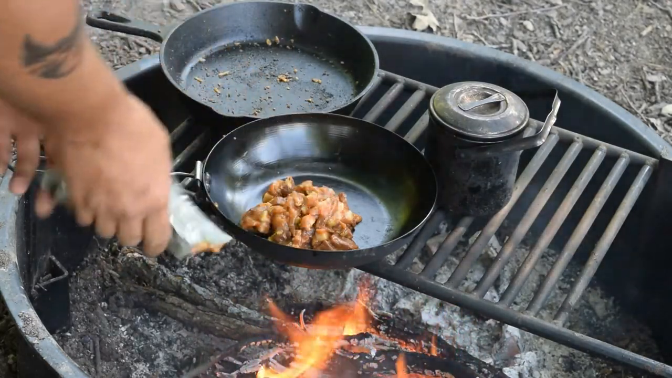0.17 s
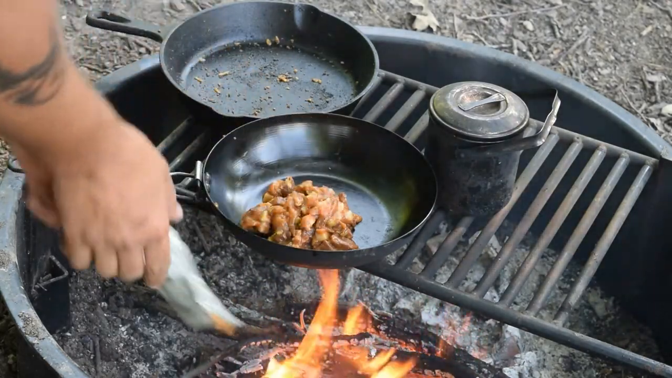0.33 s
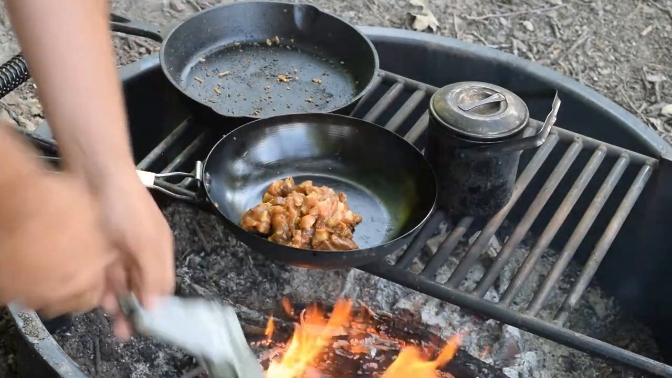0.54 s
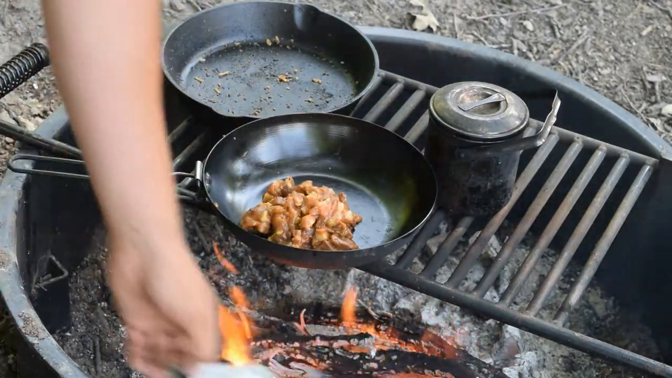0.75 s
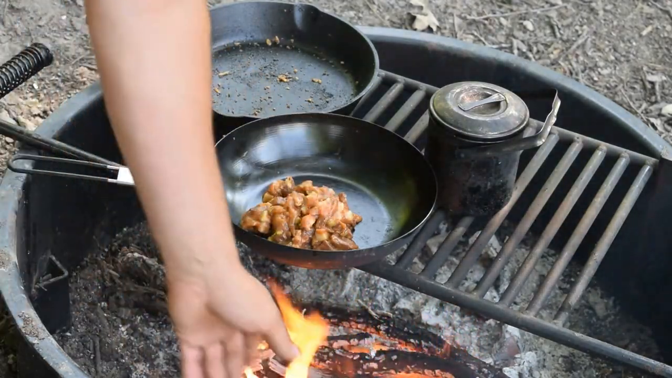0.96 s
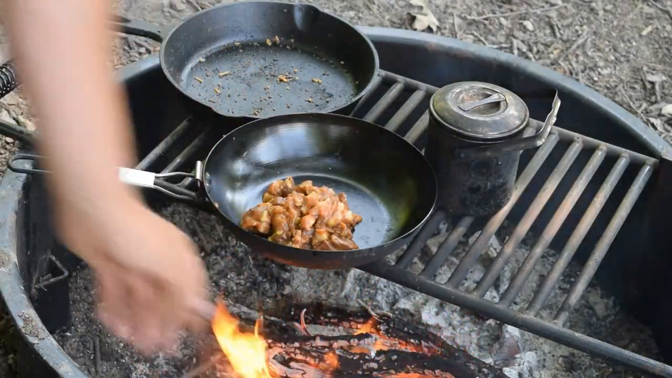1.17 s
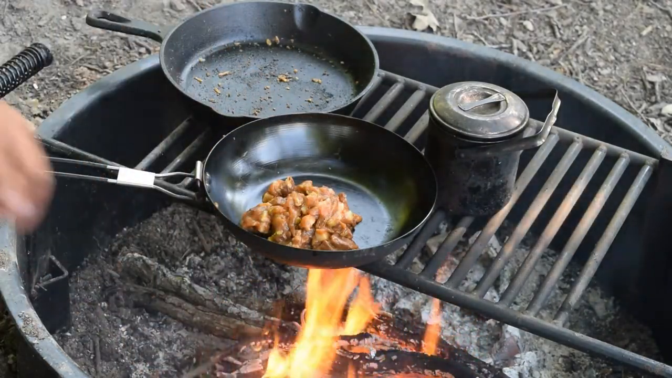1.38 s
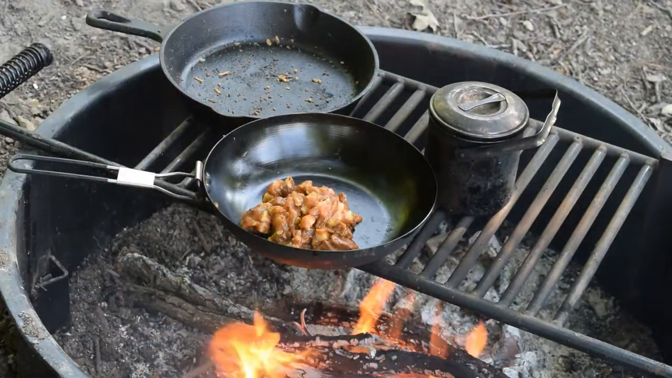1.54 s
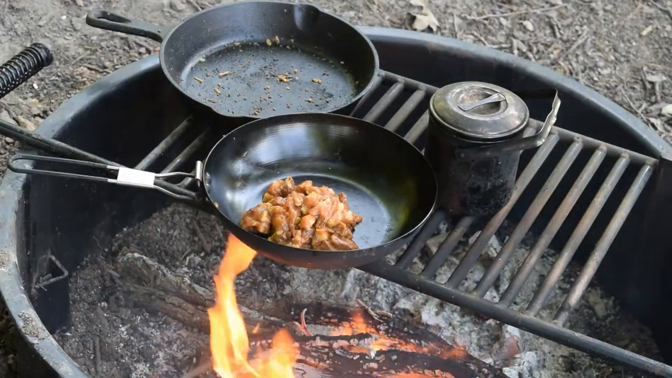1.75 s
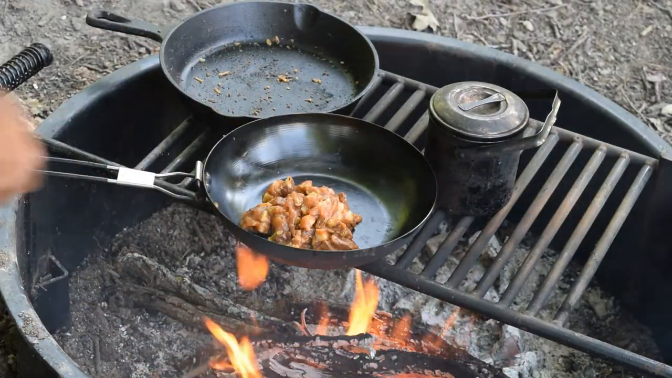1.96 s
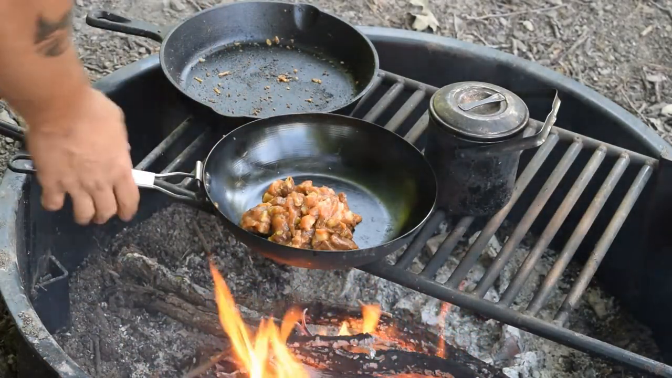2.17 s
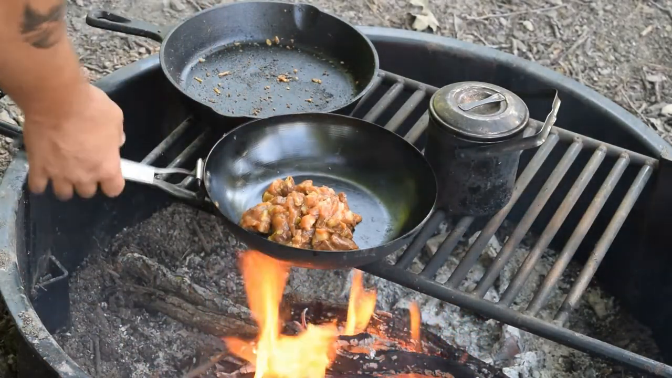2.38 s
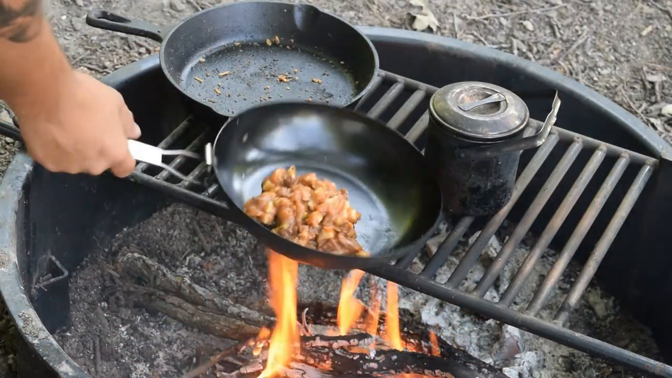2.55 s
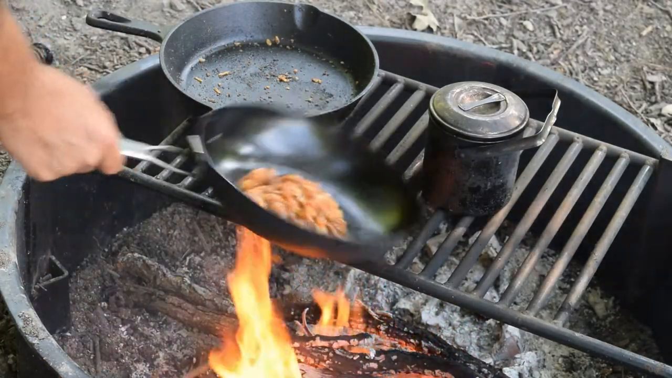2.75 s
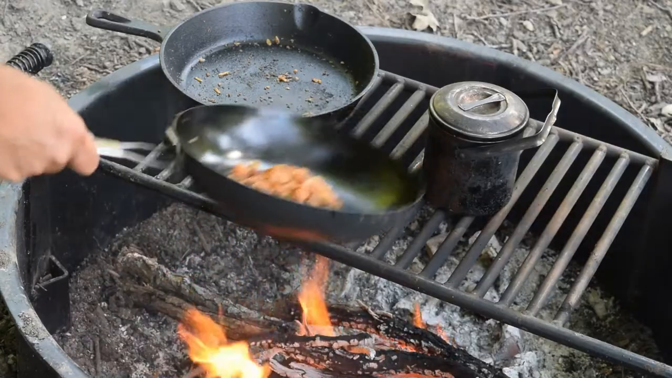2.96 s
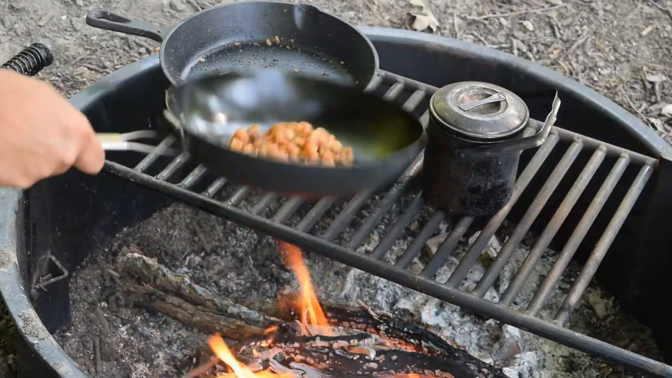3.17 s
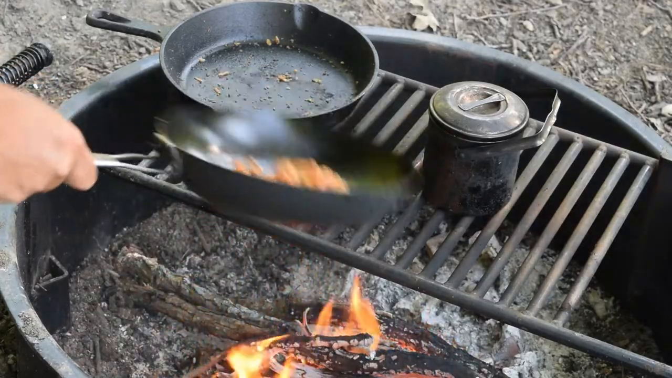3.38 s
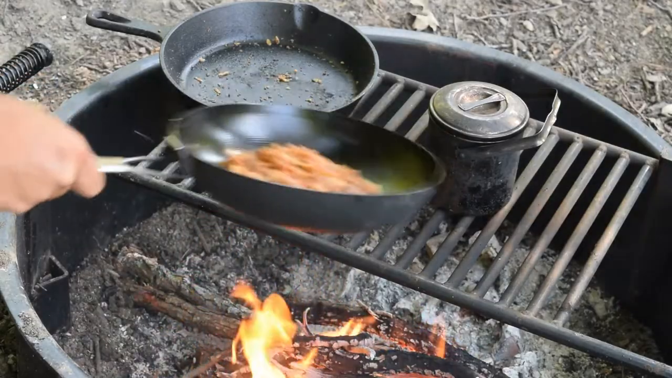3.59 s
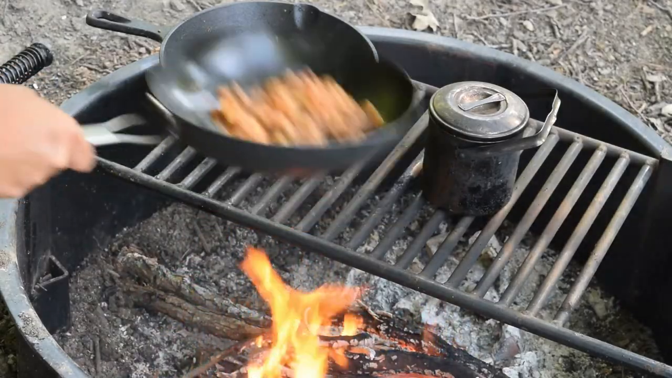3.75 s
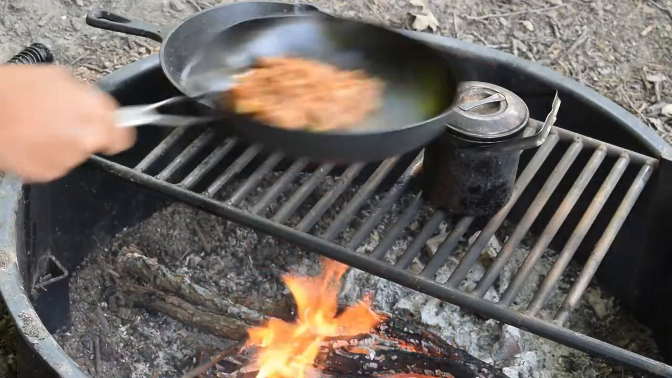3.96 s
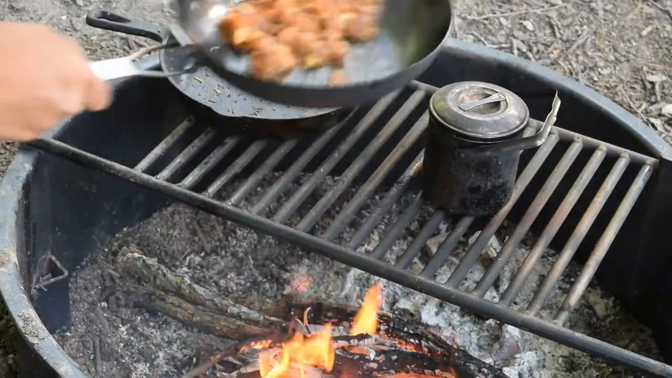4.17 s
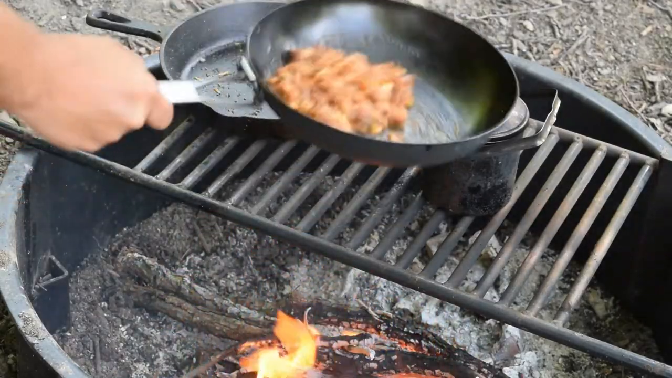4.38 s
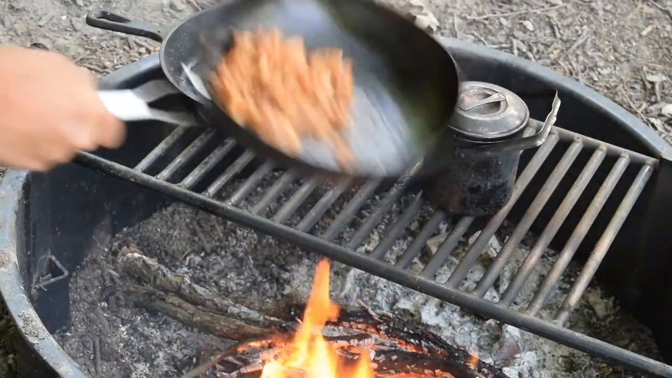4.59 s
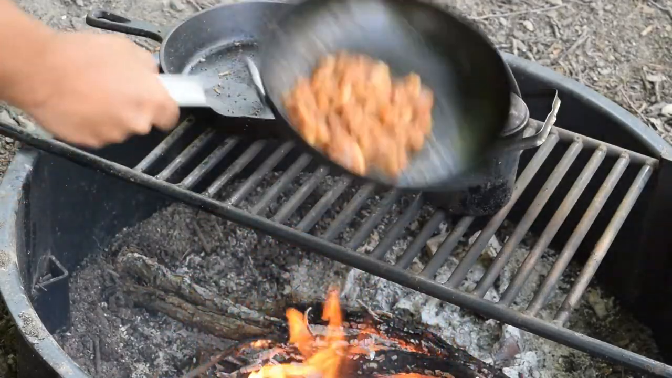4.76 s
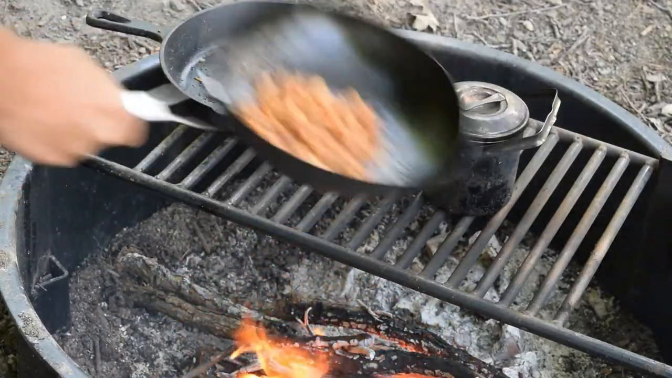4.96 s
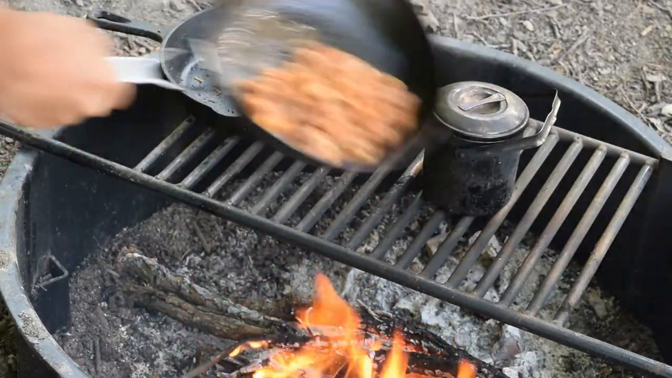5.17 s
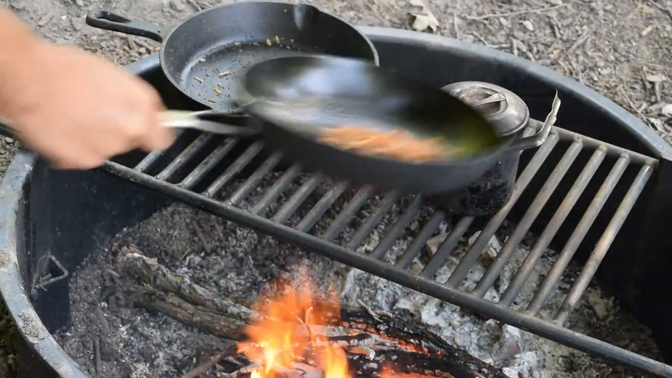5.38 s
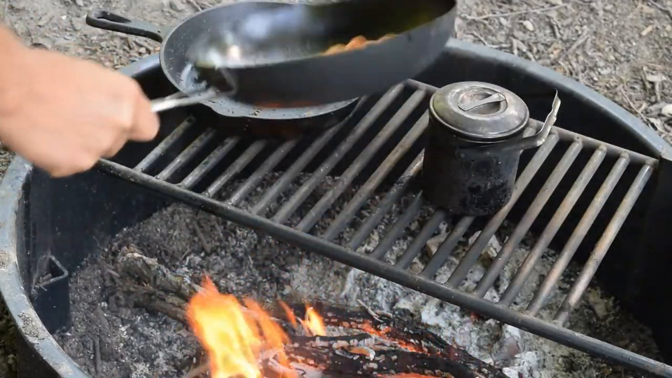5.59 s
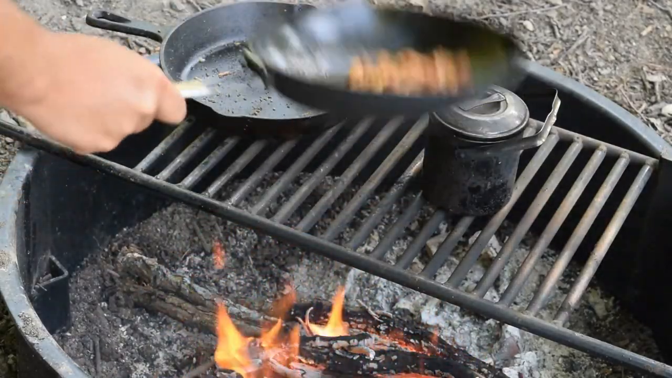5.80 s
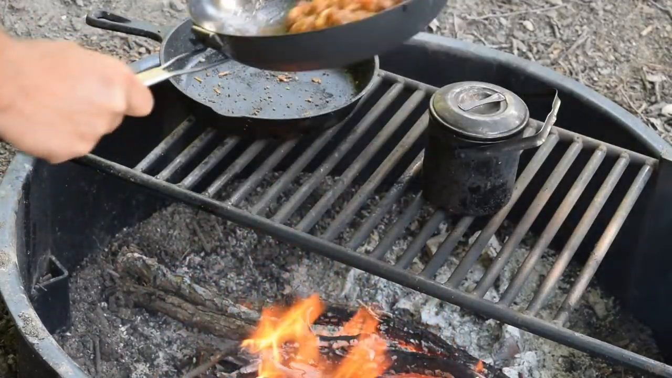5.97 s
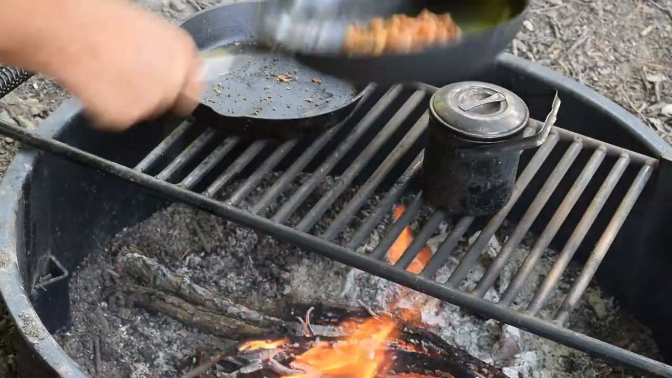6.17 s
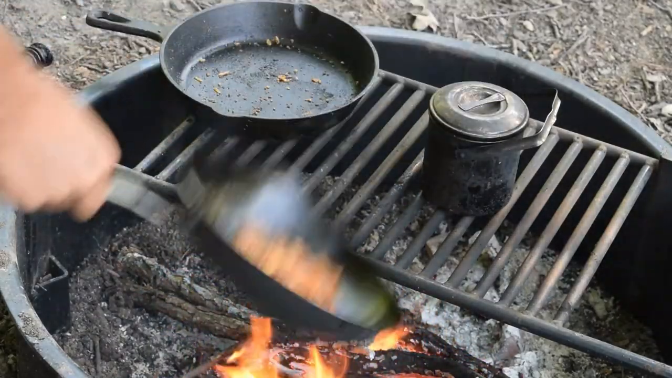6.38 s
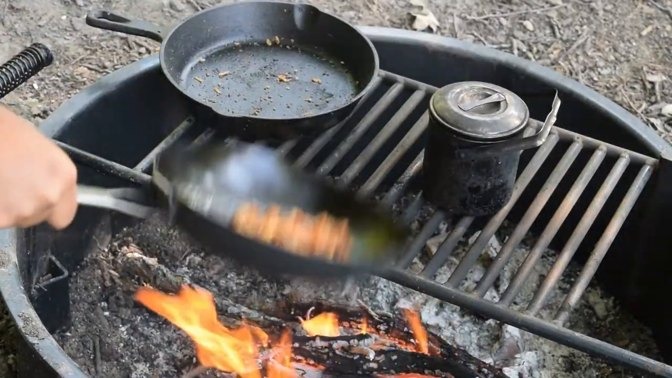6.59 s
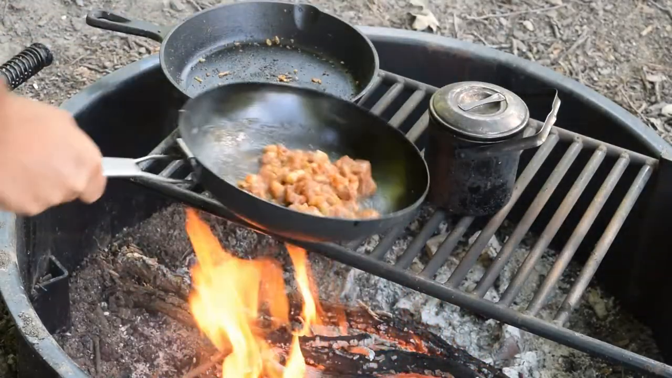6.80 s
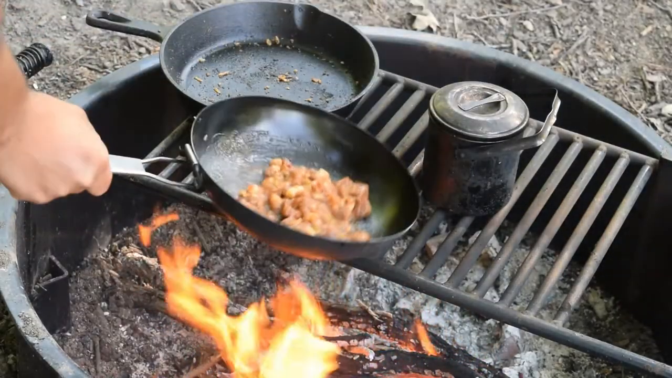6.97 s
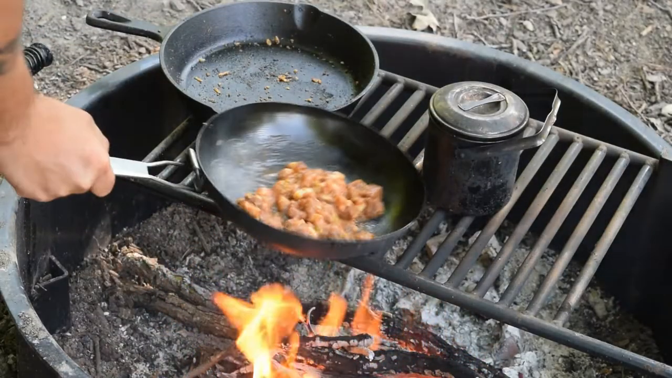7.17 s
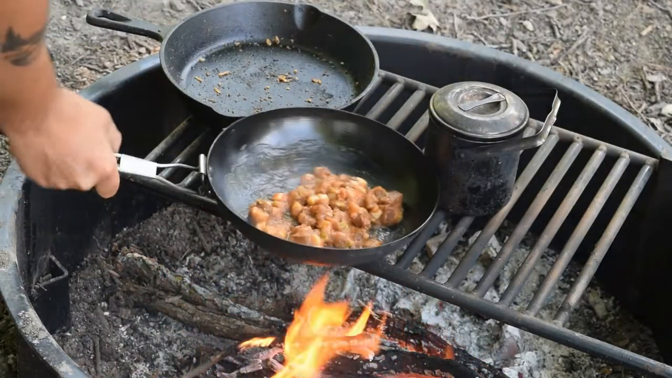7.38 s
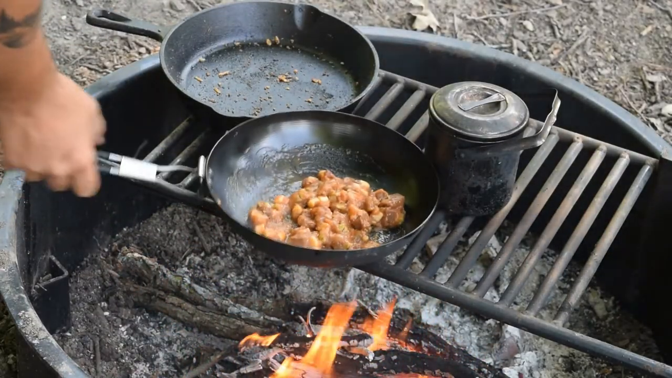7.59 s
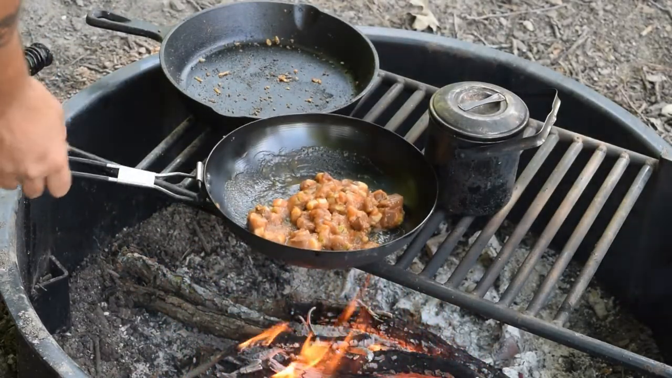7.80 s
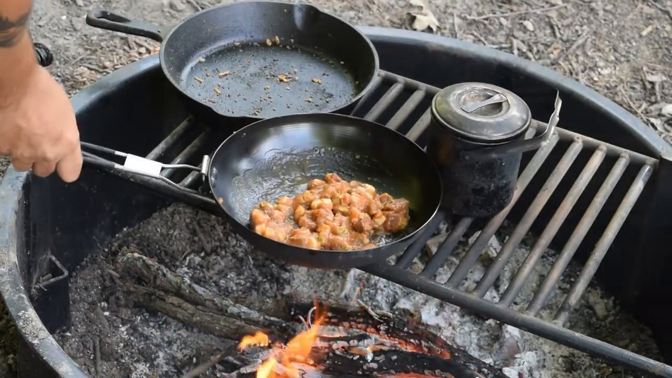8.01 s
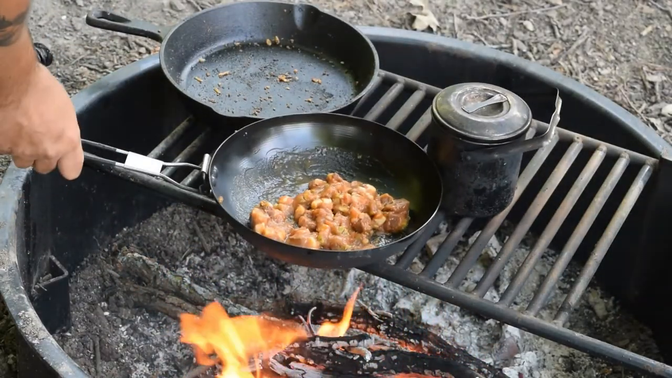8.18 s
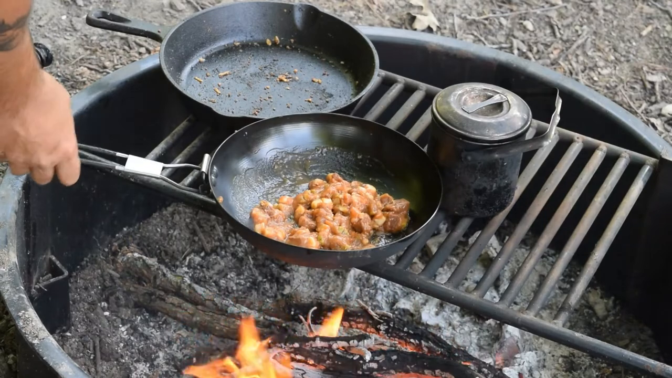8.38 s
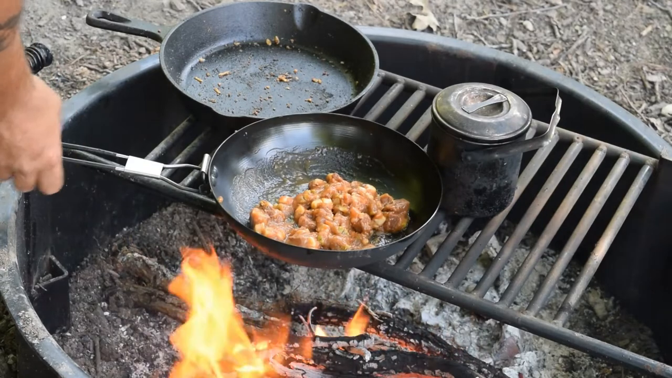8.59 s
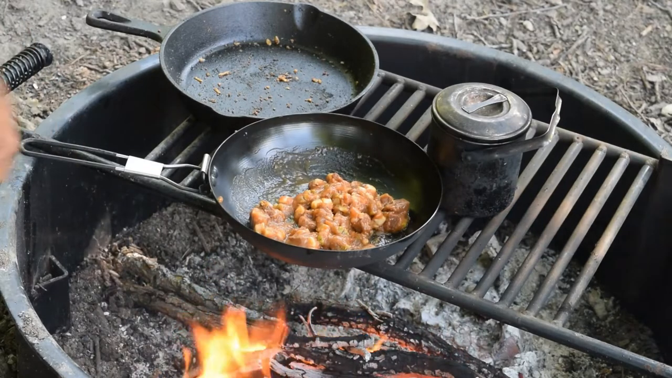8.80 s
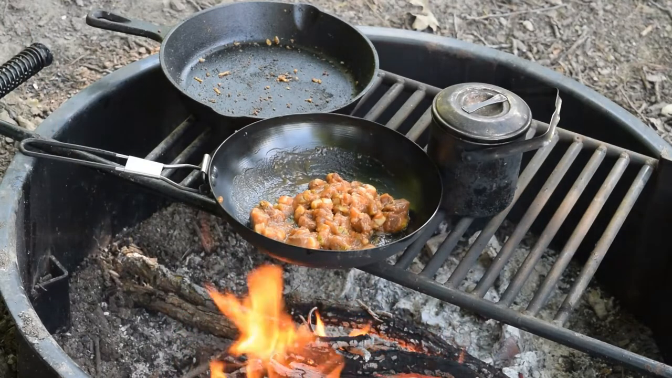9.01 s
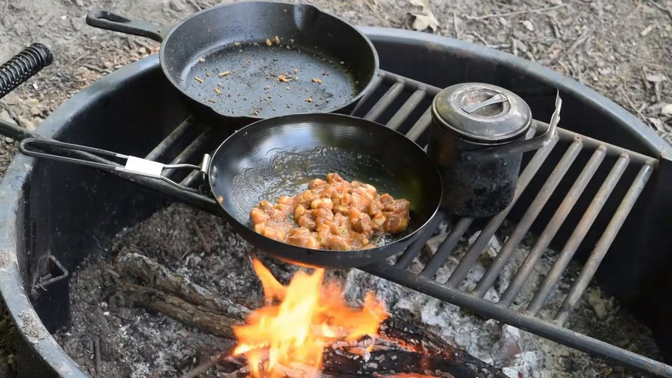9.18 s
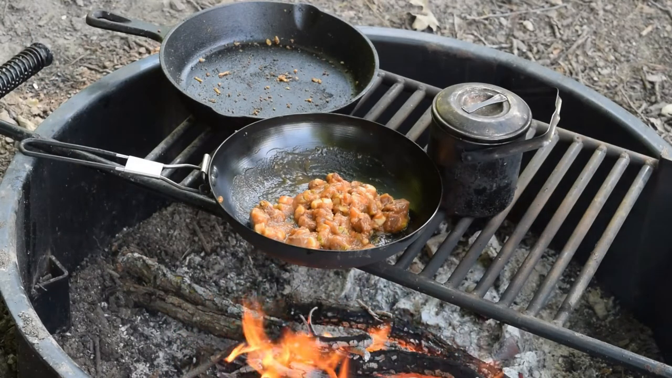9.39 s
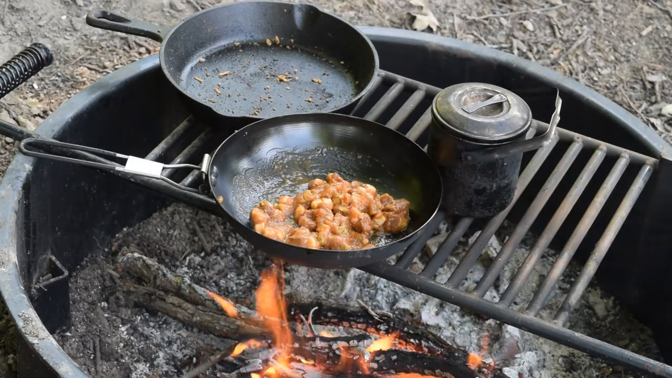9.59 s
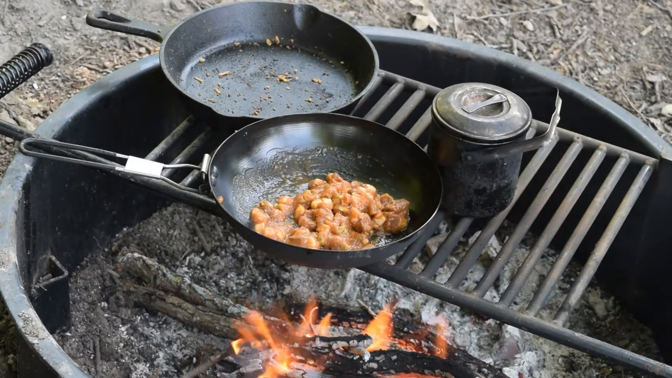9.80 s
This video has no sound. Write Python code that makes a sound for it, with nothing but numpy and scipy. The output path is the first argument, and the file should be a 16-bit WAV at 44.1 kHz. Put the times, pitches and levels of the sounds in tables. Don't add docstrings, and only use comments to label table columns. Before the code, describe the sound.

Meat in a thin steel pan over an open wood fire, heard close and centred with faint microphone hiss. Quiet air and distant chirps first, small metal taps, a short swelling sizzle with hollow bowl resonance, scattered dry crackles and fat pops, a strong clank and ringing clinks on iron bars, then calm with faint cricket trills and a sharp snap.

```python
import sys
import numpy as np
from scipy import signal
from scipy.io import wavfile
from scipy.ndimage import uniform_filter1d

SR = 44100
rng = np.random.default_rng(int(sys.argv[2]) if len(sys.argv) > 2 else 0)


def wrap_up_sound(samples):
    columns = np.atleast_2d(samples).T
    tamed = np.clip(columns, -1, 1)
    steps = np.round(tamed * 32767).astype(np.int16)
    wavfile.write(sys.argv[1], SR, steps)


def volts_from_decibels(level):
    exponent = np.asarray(level, float) / 20
    return 10 ** exponent


N = 434385

# pitch_hz, level_db per Hz
AIR_SPECTRUM = [(12, -32), (20, -4.5), (59, -1.5), (114, -0.5), (137, -7.5), (203, -10.5), (450, -12.5),
                (942, -16.5), (2000, -20.5), (4370, -23), (7000, -24.5), (9000, -30.5), (11000, -32),
                (15800, -38)]
# pitch_hz, level_db per Hz
HISS_SPECTRUM = [(35, -40), (60, -11), (200, -3.5), (660, -2), (1000, -8), (1800, -5.5), (3000, -4),
                 (4500, -4), (8600, -5), (12000, -5.5), (15800, -7.5)]
# pitch_hz, level_db
MIC_COLOUR = [(100, -44), (500, 0.5), (5000, 0), (6800, -2), (8500, 4.5), (9500, -5.5), (10500, -17.5),
              (13000, -3), (16500, -17), (18000, -19)]

# start_s, top_hz, depth (share of top pitch), level_db
BIRD_ARCHES = [
    (.034, 3900, 0.19, -53),
    (.158, 4100, .23, -56),
    (.289, 4200, 0.28, -57),
    (.425, 4100, .18, -58),
    (.875, 4200, .14, -63),
    (4.845, 4700, .1, -55),
    (4.98, 4650, .09, -59),
    (5.105, 4200, .05, -55),
    (5.42, 4130, 0.25, -58),
]
# start_s, start_hz, level_db
BIRD_SLIDES = [
    (4.931, 5000, -56),
    (5.056, 5200, -55),
    (5.181, 5000, -54),
    (5.309, 4700, -53),
]
# start_s, length_s, pitch_hz, level_db
CRICKET_TRILLS = [
    (.34, 0.15, 4830, -63),
    (.58, 0.13, 4650, -69),
    (8.14, .14, 6050, -68),
    (8.44, .08, 6000, -68),
    (8.815, .045, 5150, -65),
    (8.945, 0.11, 4600, -64),
    (9.17, 0.22, 4600, -66),
    (9.67, 0.16, 4780, -64),
]

# start_s, peak_db, crumble_db (re snap), hold_s, t60_s
EMBER_BURSTS = [
    (9.2572, -12, -18.5, .0035, .016),
]
# start_s, peak_db, centre_hz, droplet_db (re peak)
WOOD_CRACKLES = [(1.0234, -40, 2200, -20), (2.371, -41, 2520, -12), (2.602, -51, 2900, 10),
                 (3.7564, -41, 4370, -6), (4.0988, -32.5, 3960, -13), (4.5153, -42, 2790, -20),
                 (4.6635, -34.5, 3040, -23), (4.6834, -44, 3630, -20), (4.8145, -37, 4530, -10),
                 (5.0428, -42, 5670, -2), (5.1602, -38.5, 5020, -9), (5.236, -34, 4630, -14),
                 (5.5664, -40, 3540, -20), (5.8187, -38.5, 3610, -20), (5.9234, -40, 3470, -20),
                 (5.989, -34, 4600, -14), (6.1918, -43, 2640, -20), (6.4004, -30, 3420, -19),
                 (6.556, -38, 3140, -20), (6.7092, -40, 3070, -20), (6.767, -37, 5560, -11),
                 (6.9082, -42, 2750, -10), (6.949, -41, 2640, -20), (6.982, -39, 4390, -17),
                 (6.9955, -40, 4510, -3), (7.5415, -32.5, 5350, -15), (7.6999, -37.5, 4800, -19),
                 (7.9937, -37, 3310, -20), (8.5126, -33, 3430, -8), (8.736, -36.5, 3450, -14)]

# start_s, peak_db, thud_hz, pan_ring_db, bar_ring_db
PAN_KNOCKS = [
    (2.5598, -34.5, 506, -32, -21),
    (2.598, -41, 550, -30, -24),
    (2.6437, -25, 560, -32, -24.5),
    (7.0659, -9, 713, -22.5, -31),
    (7.1326, -22, 587, -27, -29),
    (7.1454, -27.5, 1030, -30, -34),
    (7.1793, -29.5, 1500, -21.5, -16),
    (7.2262, -31.5, 1380, -30, -24),
    (7.2651, -20.5, 630, -30.5, -15),
    (7.666, -34.5, 420, -36, -22),
]
# pitch_hz, level_db, t60_s
PAN_MODES = [(479, 12.5, 0.13), (639, 12, 0.072), (1070, 5, 0.28), (1232, 11, 0.082), (1423, 1, 0.09),
             (1456, 13, 0.048), (1647, -5.5, 0.17), (1970, -4, 0.31), (2210, -3, 0.27), (2506, -9, 0.3),
             (2800, -19, 0.38), (3470, -10.5, 0.22), (3780, -12, 0.19), (4570, -20, 0.25)]
# pitch_hz, level_db, t60_s
BAR_MODES = [(334, -6, 0.22), (439.5, -8.5, 0.33), (520, -16, 0.23), (523, 1.5, 0.37), (663, -6, 0.12),
             (859, 2.5, 0.11), (1180, -8, 0.095), (1500, -3, 0.092)]
# delay_s, level_db
FIRE_RING_ECHOES = [
    (.0052, -12.5),
    (.0125, -22),
]

# start_s, rms_db, length_s, strongest_hz, lift_db
WATER_SPUTTERS = [
    (1.0335, -44.5, 0.0081, 4040, -3.5),
    (2.6012, -50, .006, 2880, 5),
    (3.19, -57.5, 0.022, 8600, 16),
    (6.283, -48.5, 0.022, 8000, -1.5),
    (6.777, -53.5, 0.0071, 6000, 0),
    (8.513, -55, 0.0043, 3800, 10),
]
# start_s, peak_db, droplet_db (re peak)
FAT_POPS = [(.404, -39, 3), (1.8647, -39, -7), (2.7516, -36, -25), (3.1961, -47, -20), (3.2804, -34, -9),
            (3.2939, -30, -25), (3.3914, -37, -22), (3.972, -46, 7), (4.185, -34, -22), (4.3254, -46, 2),
            (4.6279, -36, -5), (5.5365, -33, -21), (5.6266, -37, -10), (5.7109, -52, 3), (6.015, -55, 3),
            (6.072, -36, -20), (6.334, -34.5, -15), (6.352, -44, -3), (7.0645, -31, -15),
            (7.0967, -31.5, -10), (7.137, -39, -14), (7.1467, -46, 0), (7.1584, -38, -7), (7.266, -39, -6),
            (7.652, -39, -20), (9.4594, -46, -3), (9.5574, -33, -9)]
# pitch_hz, level_db per Hz
FIZZ_SPECTRUM = [(400, -47), (800, -3.5), (1400, -2), (2500, -3), (6500, -8), (8400, -3.5), (9300, -7),
                 (10200, -18.5), (12000, -16.5), (14000, -15), (15800, -23)]
# time_s, level_db
BOIL_LEVEL = [(0, -69.5), (2.6, -70.5), (3.12, -66.5), (3.27, -59), (3.29, -55), (3.4, -54.5), (3.48, -49),
              (3.58, -47.5), (3.74, -47.5), (3.87, -44.5), (3.96, -52), (4.23, -51.5), (4.3, -58),
              (4.6, -62), (6, -65.5), (7.4, -63), (8.6, -70), (9.85, -62.5)]
# start_s, end_s, bowl_lift_db
BOWL_TILTS = [
    (3.27, 3.357, 11),
    (3.417, 3.556, 13),
    (3.605, 3.873, 8.5),
    (4.07, 4.12, -4),
    (4.16, 4.226, -8),
]


def evened(x):
    return x / np.sqrt(np.mean(x ** 2) + 1e-20)


def spectrum_at(points, hz):
    f, value = np.transpose(points)
    return np.interp(np.log(hz + 1), np.log(f + 1), value)


def add(mix, start_s, sound):
    part = mix[round(start_s * SR):][:len(sound)]
    part += sound[:len(part)]


def ring(x, hz, width_hz):
    return signal.lfilter(*signal.iirpeak(hz, hz / width_hz, SR), x)


def band(x, lo_hz, hi_hz):
    return signal.sosfilt(signal.butter(3, [lo_hz, hi_hz], "band", fs=SR, output="sos"), x)


def causal(points):
    log_gain = np.log(volts_from_decibels(spectrum_at(points, abs(np.fft.fftfreq(4096, 1 / SR)))))
    return np.fft.ifft(np.exp(np.conj(signal.hilbert(log_gain)))).real[:2048]


def noise(points, patchy_db, swell_db):
    frames, hz = N // 256 + 5, np.fft.rfftfreq(1024, 1 / SR)
    a, b, patches = rng.standard_normal((frames, 513, 3)).T
    swell = evened(uniform_filter1d(patches[0], 40))
    patches = evened(uniform_filter1d(uniform_filter1d(patches, 10, 0), 12, 1))
    level_db = spectrum_at(points, hz)[:, None] + patchy_db * patches + swell_db * swell
    z = (a + 1j * b) * volts_from_decibels(level_db)
    return evened(signal.istft(z, nperseg=1024, noverlap=768)[1][:N])


def capsule_hiss():
    return volts_from_decibels(-72) * noise(HISS_SPECTRUM, patchy_db=.5, swell_db=0)


def outdoor_air():
    return volts_from_decibels(-54) * noise(AIR_SPECTRUM, patchy_db=0, swell_db=.5)


def bird_note(length_s, start_hz, top_hz, end_hz):
    u = np.arange(0, length_s, 1 / SR) / length_s
    hz = np.interp(u, [0, .45, 1], [start_hz, top_hz, end_hz])
    tone = np.sin(2 * np.pi * np.cumsum(hz) / SR) * signal.windows.tukey(len(u), .3)
    tone *= 1 + .12 * evened(uniform_filter1d(rng.standard_normal(len(u)), 60))
    trees = rng.standard_normal(2000) * volts_from_decibels(-34 - 60 * np.arange(2000) / SR / 0.093)
    trees[0] = 0.71
    return signal.oaconvolve(tone, trees)


def bird_arch(top_hz, depth):
    length_s = 0.0135 + 0.086 * depth
    return bird_note(length_s, top_hz * (1 - depth), top_hz, top_hz * (1 - 1.14 * depth))


def bird_slide(start_hz):
    return bird_note(.015, start_hz, .86 * start_hz, .68 * start_hz)


def cricket_trill(length_s, hz):
    t = np.arange(0, length_s, 1 / SR)
    throb = 1 - .5 * np.cos(2 * np.pi * 45 * t) ** 2
    tone = np.sin(2 * np.pi * hz * t) + 0.22 * evened(ring(rng.standard_normal(len(t)), hz, 120))
    return tone * throb * volts_from_decibels(-25 * t) * signal.windows.tukey(len(t), .2)


def ember_burst(crumble_db, hold_s, t60_s):
    t = np.arange(2000) / SR
    fade_db = -60 * np.maximum(t - hold_s, 0) / t60_s
    crumble = band(rng.standard_normal(2000), 1140, 5800) * volts_from_decibels(crumble_db + fade_db)
    crumble[:8] = -signal.windows.hann(8) ** 2.3
    shape = signal.oaconvolve(crumble, causal(MIC_COLOUR))[:2000]
    return shape / abs(shape[:20]).max()


def pop(hz, breadth, puff_db):
    t = np.arange(2000) / SR
    puff = rng.standard_normal(2000) * volts_from_decibels(puff_db - 60 * t / 0.019)
    puff[:40] = -signal.unit_impulse(40, 36)
    width_hz = breadth * hz
    cell = ring(ring(puff, hz, width_hz), hz, width_hz)
    shape = signal.oaconvolve(cell, causal(MIC_COLOUR))[:2000]
    return shape / abs(shape[:80]).max()


def droplet_spit():
    t = np.arange(-30, 1970) / SR
    tick = band(rng.standard_normal(2000) * (t >= 0) * volts_from_decibels(-60 * t / 0.0039), 8600, 15000)
    return tick / abs(tick).max()


def wood_crackle(hz, droplet_db):
    return pop(hz, breadth=1.37, puff_db=-16.5) + volts_from_decibels(droplet_db) * droplet_spit()


def blow(t, thud_hz):
    u = (t[:400] - 1 / thud_hz) * thud_hz
    thud = np.cos(2 * np.pi * u - .3) * np.exp(-(u / np.where(u < 0, .55, .9)) ** 2)
    return thud + 0.15 * np.cos(4 * np.pi * u + 0.45) * np.exp(-(u / .5) ** 2)


def pan_knock(thud_hz, pan_db, bar_db):
    t = np.arange(SR // 2) / SR
    rattle_db = -24 + 5.5 * np.log2(thud_hz / 600)
    taps = rng.standard_normal(len(t)) * (rng.random(len(t)) < 1500 / SR)
    taps *= volts_from_decibels(rattle_db - 60 * t / 0.15)
    taps[:200] = signal.unit_impulse(200)
    for delay_s, db in FIRE_RING_ECHOES:
        taps[round(delay_s * SR)] = -volts_from_decibels(db)
    out = signal.oaconvolve(taps, blow(t, thud_hz))[:len(t)]
    out += volts_from_decibels(-15.5 - 60 * t / 0.037) * np.sin(2 * np.pi * 215 * t) * (1 - np.exp(-t / 0.0026))
    out += volts_from_decibels(pan_db - 1.5 - 60 * t / 0.18) * evened(band(rng.standard_normal(len(t)), 670, 3150))
    settle_db = 60 * np.maximum(t - .1, 0) / 0.14
    onset = 1 - np.exp(-np.maximum(t - 1.17 / thud_hz, 0) / 0.00096)
    for modes, lift_db, buzz in ((PAN_MODES, pan_db - 4, .8), (BAR_MODES, bar_db, .6)):
        for hz, db, t60_s in modes:
            swing = np.sin(2 * np.pi * (hz * t + rng.random())) * onset
            contact = 1 + buzz * evened(uniform_filter1d(rng.standard_normal(len(t)), 160))
            out += volts_from_decibels(lift_db + db - 60 * t / t60_s - settle_db) * swing * contact
    return out


def water_sputter(length_s, hz, lift_db):
    t = np.arange(2000) / SR
    run = rng.standard_normal(2000) * volts_from_decibels(-300 * t - 60 * np.maximum(t - length_s, 0) / 0.02)
    run = signal.oaconvolve(run, causal(FIZZ_SPECTRUM))[:2000]
    run = run + volts_from_decibels(lift_db) * ring(run, hz, .18 * hz)
    return run / np.std(run[t < length_s])


def fat_pop(droplet_db):
    return pop(8000, breadth=1.5, puff_db=-15) + volts_from_decibels(droplet_db) * droplet_spit()


def patchy(x, patchy_db):
    z = signal.stft(x, nperseg=256)[2]
    patches = uniform_filter1d(uniform_filter1d(rng.standard_normal(z.shape), 9, 0), 9, 1)
    return signal.istft(z * volts_from_decibels(patchy_db * evened(patches)), nperseg=256)[1][:N]


def bubble_bursts():
    clumps = volts_from_decibels(2.2 * evened(uniform_filter1d(rng.standard_normal(N), 250)))
    sizes = volts_from_decibels(3 * np.minimum(rng.exponential(1, N), 5)) * rng.choice([-1, 1], N)
    clicks = sizes * (rng.random(N) < clumps * 5000 / SR)
    return signal.oaconvolve(clicks, causal(FIZZ_SPECTRUM))[:N]


def frying():
    t = np.arange(N) / SR
    boil_db = np.interp(t, *np.transpose(BOIL_LEVEL))
    tilt_db = np.zeros(N)
    for start_s, end_s, db in BOWL_TILTS:
        tilt_db += db * np.clip(np.minimum(t - start_s, end_s - t) / .03 + .5, 0, 1)
    keep = np.exp(-1 / (0.15 * SR))
    trailing_db = signal.lfilter([1 - keep], [1, -keep], boil_db - boil_db[0]) + boil_db[0]
    lag_db = trailing_db - boil_db
    gusts = evened(uniform_filter1d(uniform_filter1d(rng.standard_normal(N), 1200), 1200))
    even = bubble_bursts()
    bursts = patchy(even, patchy_db=1)
    fizz = 1.087 * evened(band(bursts, 870, 9000))
    bowl = volts_from_decibels(-17 + tilt_db) * evened(ring(ring(even, 1420, 480), 1420, 480))
    spray = volts_from_decibels(-8 + 0.33 * lag_db) * evened(band(bursts, 10800, 16000))
    return volts_from_decibels(boil_db + 1.0 * gusts) * (fizz + bowl + spray)


def scene():
    mid = outdoor_air() + frying()
    side = capsule_hiss()
    edge = signal.firwin(1001, 15880, window=("kaiser", 8), fs=SR)
    mid, side = signal.oaconvolve([mid, side], edge[None], "same")
    for table, source in ((BIRD_ARCHES, bird_arch), (BIRD_SLIDES, bird_slide), (CRICKET_TRILLS, cricket_trill)):
        for start_s, *shape, db in table:
            add(mid, start_s, volts_from_decibels(db) * source(*shape))
    for table, source in ((EMBER_BURSTS, ember_burst), (WOOD_CRACKLES, wood_crackle),
                          (WATER_SPUTTERS, water_sputter), (FAT_POPS, fat_pop)):
        for start_s, db, *colour in table:
            add(mid, start_s, volts_from_decibels(db) * source(*colour))
    for start_s, db, thud_hz, *rings in PAN_KNOCKS:
        add(mid, start_s - 1 / thud_hz, volts_from_decibels(db) * pan_knock(thud_hz, *rings))
    return np.array([mid + side, mid - side])


def top_cut(x):
    return signal.sosfilt(signal.butter(12, 16650, fs=SR, output="sos"), x)


def record(dry):
    top = signal.firwin(301, 16500, window=("kaiser", 8), fs=SR)
    mix = signal.oaconvolve(dry, top[None], "same")
    return top_cut(mix)


dry = scene()
out = record(dry)
wrap_up_sound(out)
```